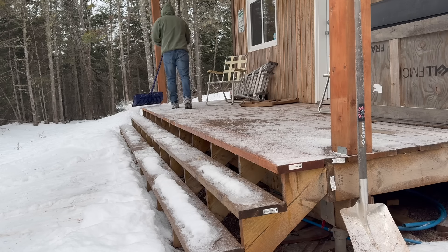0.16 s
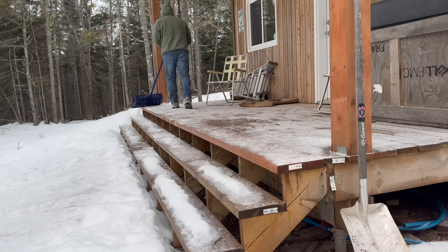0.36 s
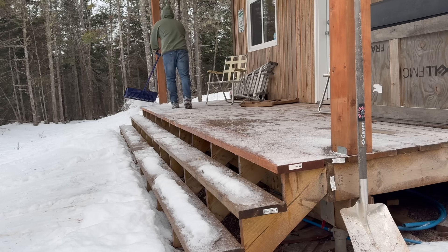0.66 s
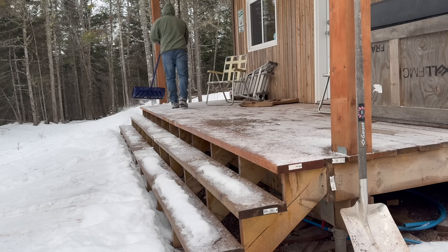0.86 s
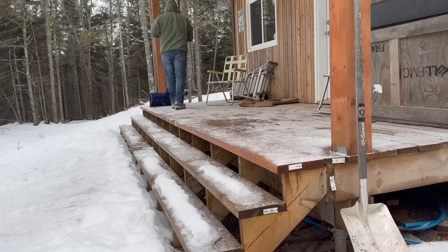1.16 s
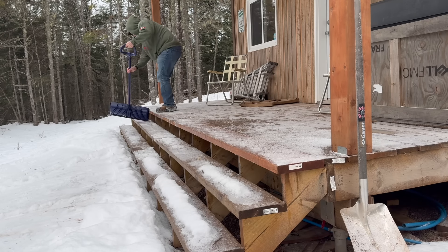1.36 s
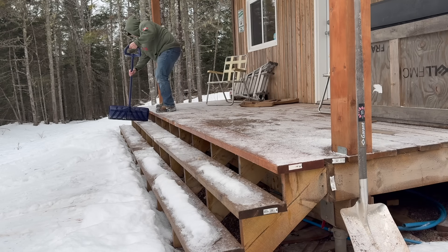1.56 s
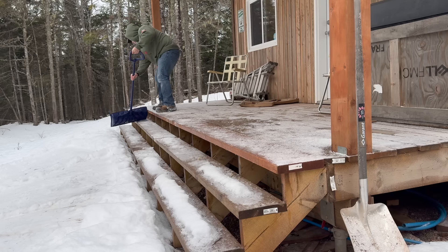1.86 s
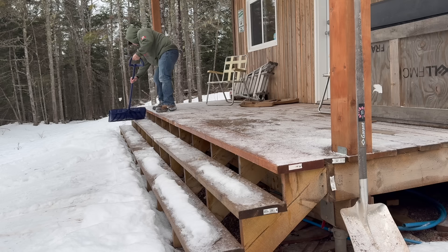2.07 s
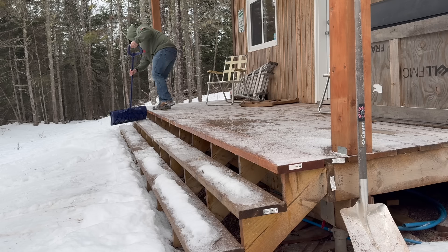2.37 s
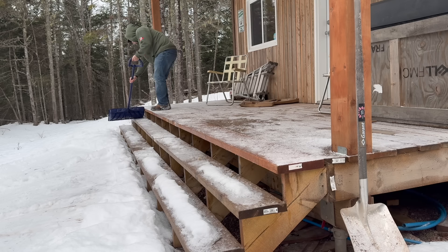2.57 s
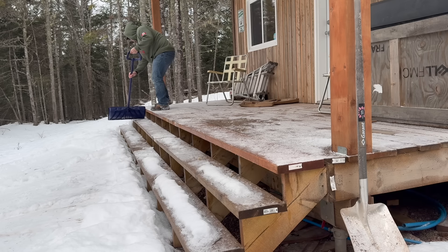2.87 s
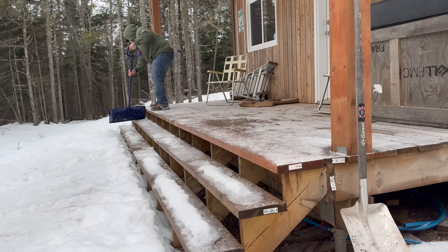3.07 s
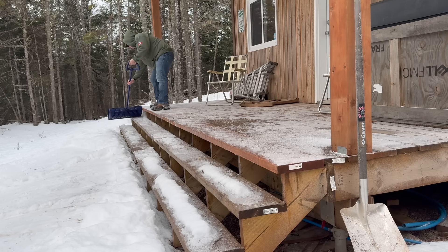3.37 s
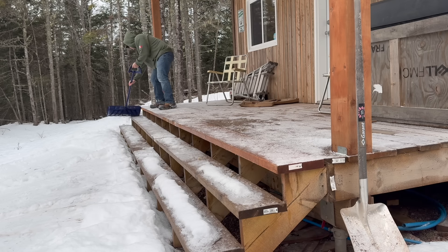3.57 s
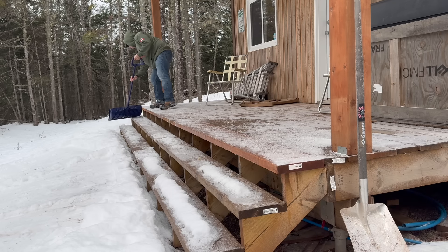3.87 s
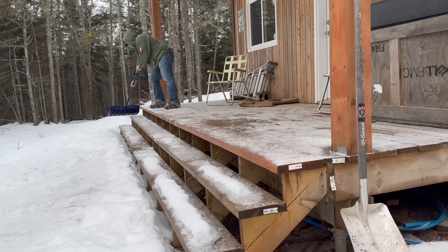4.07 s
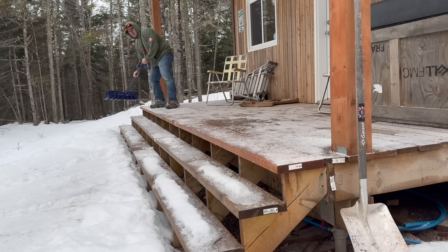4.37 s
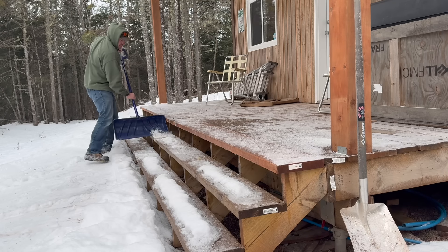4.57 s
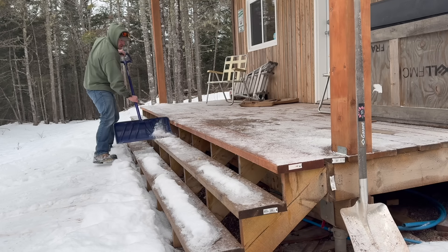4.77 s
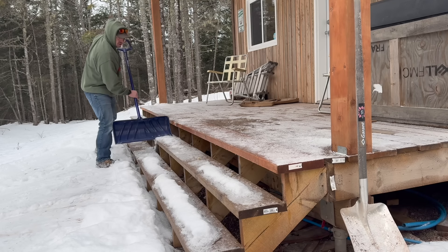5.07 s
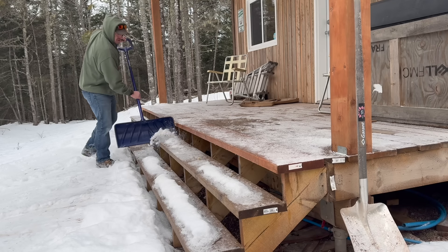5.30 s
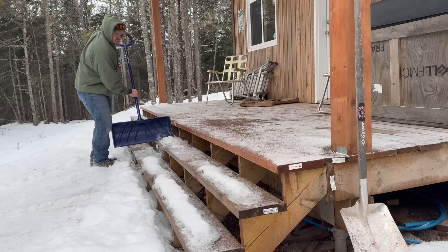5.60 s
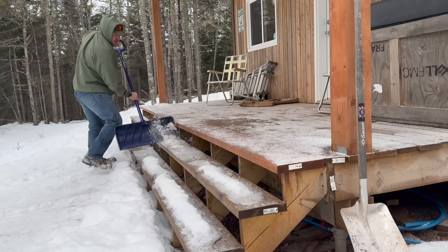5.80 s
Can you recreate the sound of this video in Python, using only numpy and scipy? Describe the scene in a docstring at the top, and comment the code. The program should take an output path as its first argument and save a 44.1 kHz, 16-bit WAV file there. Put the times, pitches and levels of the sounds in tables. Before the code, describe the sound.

A plastic snow shovel scrapes wooden deck boards in short gritty strokes, with sharp catches, hollow knocks and hissing icy snow, outdoors in quiet air.

```python
"""Snow shovel on a wooden deck

A plastic snow shovel scrapes deck boards and steps in short strokes, some metres from a phone with two ports.
Its edge judders over ice grains: shaped noise drives resonances of blade and boards and a hiss of snow.
Sudden decaying bursts mark catches of the edge; damped modes sound taps on the blade and knocks on the deck.
Low noise is the shaking of the hollow deck, decaying noise the short tail from cabin wall and trees.
"""
import sys
import numpy as np
from scipy import signal
from scipy.fft import rfft, irfft, next_fast_len
from scipy.io import wavfile
from scipy.ndimage import uniform_filter1d

SR = 44100
rng = np.random.default_rng(int(sys.argv[2]) if len(sys.argv) > 2 else 0)


def wav_record(signal):
    """Record a signal, one row per channel, as 16-bit PCM in the file named by sys.argv[1]."""
    frames = np.transpose(np.atleast_2d(signal))
    bounded = np.clip(frames, -1, 1)
    # unit amplitude maps onto the largest positive 16-bit level
    quanta = np.round(bounded * 32767).astype(np.int16)
    wavfile.write(sys.argv[1], SR, quanta)


N = 261954
TIME = np.arange(N) / SR  # s
SIZE = next_fast_len(N + SR)  # padded, so that filter tails do not wrap round
FREQ = np.arange(SIZE // 2 + 1) * SR / SIZE  # Hz

# Modes of the blade: f/Hz, bandwidth/Hz, peak gain/dB
BLADE_MODES = [(553.6, 76.5, 2), (660.3, 28, 2), (731, 92, -4.5), (937.5, 49, 4.5), (1043, 63, -3),
               (1222, 87, 4), (1376.5, 35, 0), (1521, 38, 4), (1833, 18.6, -13), (2180, 134, 2.5),
               (2783, 110, -12)]
# Modes of the deck boards over their joists: f/Hz, bandwidth/Hz, peak gain/dB
BOARD_MODES = [(62, 48, -3.5), (88, 47, -3), (124, 34, -3.5), (183.4, 36.4, 0), (252.5, 31, -2),
               (329.4, 44.5, -1.5), (436.3, 34.3, -2), (545, 33, 1)]
CREST_DB = 14.5  # peak of a burst over its rms


def undb(db):
    """Decibel law: the amplitude gain of a level in dB."""
    return 10 ** (np.asarray(db) / 20)


def unit(x):
    """Normalisation of power: scale a signal to rms 1."""
    return x / np.sqrt(np.mean(x ** 2))


def unit_gain(gain):
    """Noise bandwidth: scale a response so that white noise keeps its rms."""
    return gain / np.sqrt(np.mean(np.abs(gain) ** 2))


def curve(points):
    """Linear interpolation over time of (t/s, level/dB) points."""
    return np.interp(TIME, *np.transpose(points))


def shape(points):
    """Spectral envelope: gain interpolated over log frequency from (f/Hz, gain/dB) points."""
    hz, db = np.transpose(points)
    return undb(np.interp(np.log(FREQ + 1), np.log(hz), db))


def rings(modes):
    """Modal superposition: sum of second-order resonators with alternating signs."""
    total = 0
    for k, (hz, width, db) in enumerate(modes):
        resonator = 1j * width * FREQ / (hz ** 2 - FREQ ** 2 + 1j * width * FREQ)
        total = total + (-1) ** k * undb(db) * resonator
    return total


def colour(x, gain):
    """Convolution theorem: filter a signal by multiplying its spectrum by a response."""
    return irfft(rfft(x, SIZE) * gain, SIZE)[..., :N]


def wander(rate):
    """Slow random modulation: new normal values at rate/Hz, joined by straight ramps."""
    hold = max(int(SR / rate), 1)
    steps = np.repeat(rng.standard_normal(N // hold + 1), hold)
    return 0.82 * uniform_filter1d(steps, hold)[:N]


def struck(blows, modes, focus_db):
    """Modal excitation: a blow rings most the modes near its spot, losing focus_db per octave away."""
    out, t = np.zeros(N + SR), np.arange(SR // 4) / SR
    hz, width, mode_db = np.transpose(modes)[:, :, None]
    for s, db, spot_hz, damping in blows:
        share = undb(mode_db - focus_db * np.abs(np.log2(hz / spot_hz)))
        decay = np.exp(-np.pi * width * damping * t)
        ring = np.sum(share * decay * np.sin(2 * np.pi * hz * t), axis=0)
        ring = ring * (1 - np.exp(-t * spot_hz / 1.05))  # soft contact takes about one cycle
        out[int(s * SR):][:len(t)] += undb(db) * ring / np.max(np.abs(ring))
    return out[:N]


def winter_air():
    """Partly coherent ambient noise: faint air, some of it common to both ports."""
    # Spectrum of the air: f/Hz, gain/dB
    air_spectrum = [(25, -9.5), (60, -3.5), (200, -27.5), (1000, -30), (5000, -52), (8500, -44.5),
                    (16000, -47)]
    noise = rng.standard_normal((2, N)) + 0.4 * rng.standard_normal(N)
    return undb(-49 + 1.5 * wander(6)) * unit(colour(noise, shape(air_spectrum)))


def yard(x, t60):
    """Diffuse reverberation: exponentially decaying echoes of wall, roof and trunks, unlike at each port."""
    t = np.arange(SR // 2) / SR
    tail = rng.standard_normal((2, len(t))) * undb(-60 * t / t60) * (t > .003)
    tail = tail / np.sqrt(np.sum(tail ** 2, axis=1, keepdims=True))
    return colour(x, rfft(tail, SIZE))


def deck():
    """Forced and free vibration: the hollow deck shakes under shifting weight and rings when knocked."""
    # Spectrum of the shaking: f/Hz, gain/dB
    shake_spectrum = [(20, -57), (35, -6), (60, 14), (110, 17), (170, -21)]
    # Shaking as weight shifts on the deck: t/s, level/dB
    shake_level = [(0, -34.5), (0.15, -54), (0.29, -37), (0.42, -55), (0.56, -34), (0.61, -49), (0.7, -52),
                   (0.8, -57), (0.98, -43), (1.3, -59), (1.6, -53), (1.8, -38), (2.1, -49), (2.4, -41.5),
                   (2.75, -49), (3.05, -53), (3.27, -39.5), (3.6, -56.5), (3.93, -42), (4.2, -63),
                   (4.4, -46), (4.47, -30), (4.67, -32.5), (4.8, -46.5), (4.86, -39), (5.15, -36.5),
                   (5.32, -46.5), (5.45, -36.5), (5.7, -48.5), (5.8, -41), (5.94, -40)]
    # Boots and blade knock the deck: t/s, peak level/dB, f/Hz favoured at the spot, damping (1 = free)
    knocks = [(0.008, -28, 250, 1.5), (0.067, -18, 58, 1.9), (0.098, -21, 79, 0.57),
              (0.536, -27.5, 71.6, 0.31), (0.619, -28, 340, 2.52), (0.625, -22, 100, 1.6),
              (0.649, -28, 326, 2.3), (0.642, -26, 51.1, 0.55), (0.665, -20, 67.3, 0.61),
              (0.927, -30, 250, 0.76), (0.973, -29, 258, 1.2), (0.999, -27, 293, 1),
              (1.139, -12, 270, 0.71), (1.158, -33, 265, 1.5), (1.185, -32, 300, 1), (1.225, -34, 250, 1),
              (1.763, -13.5, 336, 0.34), (3.098, -21, 180, 0.63), (3.335, -12.5, 328, 0.88),
              (4.499, -18, 100, 1.1), (4.63, -20, 132, 1.1), (4.647, -19, 117, 0.8),
              (4.685, -18, 109.4, 0.98), (4.934, -26.5, 136, 1.05), (5.108, -14.5, 322, 0.6),
              (5.812, -25, 350, 1.5)]
    shaking = unit(colour(rng.standard_normal((3, N)), shape(shake_spectrum)))
    out = shaking * undb(curve(shake_level) + 2.2 * wander(20))
    out[0] += struck(knocks, BOARD_MODES, focus_db=17.0)
    return out


def strokes():
    """Addition of powers: strokes swell, hold and fade over a light drag; colours are averaged by power."""
    # Strokes of the shovel: t/s, rise/s, hold/s, fall/s, blade level/dB,
    # then relative to the blade: boards/dB, upper blade modes/dB, snow hiss/dB
    stroke_table = [(0.035, 0.033, .005, 0.063, -43.5, 9.5, -1, -21),
                    (0.177, 0.01, 0.021, .05, -31.5, 3.5, 1, -3),
                    (0.264, 0.011, 0.027, .06, -33.5, -1.5, -7, -2.5),
                    (0.289, .11, .02, 0.12, -23.5, 2.5, -5, -8),
                    (0.937, 0.083, 0.074, 0.059, -44.5, -1, -1.5, -5),
                    (1.048, .06, 0.025, 0.045, -34, 0, -2.5, -7),
                    (1.269, .1, .01, .08, -34, -0.5, -4.5, -6.5),
                    (1.523, 0.012, 0.074, 0.069, -34, -3, -3.5, -11),
                    (1.624, 0.022, 0.063, .03, -39.5, 1.5, -3, -10.5),
                    (1.704, 0.049, .13, 0.14, -25, -0.5, -1, -1.5),
                    (2.028, 0.12, .08, .1, -28.5, -1.5, -3, -3),
                    (2.29, 0.097, 0.065, 0.19, -23.5, -2, -1.5, -3),
                    (2.673, .03, 0.033, 0.033, -35.5, -0.5, -7, -9.5),
                    (2.746, 0.029, 0.057, 0.25, -29, -1, -5, -6.5),
                    (3.007, 0.21, .15, .17, -22.5, -3, -6, -5),
                    (3.583, 0.063, 0.07, 0.12, -30.5, -0.5, -7.5, -7.5),
                    (3.805, .11, .05, .06, -28.5, 3, -7.5, -5.5),
                    (4.253, 0.064, 0.011, 0.056, -50.5, 5, -4.5, -9),
                    (4.429, 0.016, .03, 0.091, -23.5, -11, -5, -3.5),
                    (4.466, 0.095, 0.041, 0.19, -21, -5.5, -1.5, 0.5),
                    (4.824, .018, 0.0062, 0.073, -39.5, -2.5, -7, -8),
                    (4.985, 0.016, 0.055, .03, -36, -2.5, -3, 0),
                    (5.028, 0.043, .14, 0.055, -20, -8, 1.5, -0.5),
                    (5.328, 0.049, 0.011, 0.023, -31.5, 1.5, 0.5, -3.5),
                    (5.381, 0.012, 0.011, 0.046, -21.5, -9, -9, -8.5),
                    (5.415, .02, .03, 0.068, -37.5, 2, -5, -5),
                    (5.505, 0.03, 0.1, 0.074, -18, -7, -1.5, -1),
                    (5.757, 0.059, .02, 0.043, -27, 1.5, -5.5, -9),
                    (5.814, 0.055, .01, 0.076, -24.5, -2, -5.5, -13)]
    # Light drag of the edge and sliding loose snow between strokes: t/s, level/dB
    drag_level = [(0, -55.5), (0.52, -53), (0.62, -54), (0.72, -69), (0.89, -74), (0.95, -56),
                  (1.25, -51.5), (1.5, -52.5), (1.6, -44), (2.04, -42), (2.28, -50), (2.62, -44),
                  (2.96, -44), (3.02, -52.5), (3.57, -44.5), (3.8, -45.5), (4.0, -45), (4.14, -61),
                  (4.4, -57.5), (4.45, -47), (4.81, -43.5), (4.96, -59), (5.0, -40), (5.3, -46.5),
                  (5.5, -40), (5.94, -41.5)]
    drag_colours_db = (4, -1.5, -4.5)  # boards, upper blade modes, hiss against the drag level
    slide_db, slide_t60 = -16.5, .3  # snow slides on after each stroke; t60 in s

    s, rise, hold, fall, db, *colours = np.transpose(stroke_table)[:, :, None]
    up = np.clip((TIME - s) / rise, 0, 1)
    down = np.clip((s + rise + hold + fall - TIME) / fall, 0, 1)
    power = (undb(db) * up ** 1.32 * down ** 1.76) ** 2
    keep = undb(-120 / (slide_t60 * SR))  # doubled dB, as this decays a power
    power = power + undb(2 * slide_db) * signal.lfilter([1 - keep], [1, -keep], power)
    drag = undb(curve(drag_level)) ** 2
    total = power.sum(axis=0) + drag
    mix = [(c[:, 0] @ power + d * drag) / total for c, d in zip(colours, drag_colours_db)]
    return 10 * np.log10(total), *mix


def grains(spread_db):
    """Granular excitation: dense noise of uneven grain size; rows are shared, left only, right only."""
    size = np.repeat(undb(spread_db * rng.exponential(size=N // 8 + 1)), 8)[:N]
    return unit(size * rng.standard_normal((3, N)))


def slips(rate, spread_db, t60):
    """Stick-slip as a Poisson-like train: random sudden slips of the edge, each decaying quickly."""
    starts = (rng.random(N) < rate / SR) * undb(spread_db * rng.exponential(size=N))
    return signal.lfilter([1], [1, -undb(-60 / (t60 * SR))], starts)


def bursts(times, db):
    """Impulsive release: envelopes that start suddenly and decay exponentially."""
    t60 = 0.058  # s
    starts = np.zeros(N)
    starts[(times * SR).astype(int)] = undb(db)
    return uniform_filter1d(signal.lfilter([1], [1, -undb(-60 / (t60 * SR))], starts), size=16)


def blade_ring(drive, upper_db):
    """Plate resonance: a broad body plus modes that wax and wane as the blade flexes."""
    # Broad body of the scraping edge: f/Hz, gain/dB
    edge_body = [(250, -43), (450, -12), (1000, -6), (1600, -2.5), (2600, -6.5), (4000, -20.5)]
    bend_hz = 1450  # a steep blade angle favours what lies above
    body = shape(edge_body)
    high = 1 / (1 + (bend_hz / (FREQ + 1)) ** 4)
    low_response = (body + rings(BLADE_MODES)) * (1 - high)
    scale = 1 / np.sqrt(np.mean(np.abs(low_response) ** 2))
    out = colour(drive, body * (1 - high)) + undb(upper_db) * colour(drive, body * high)
    out[1:] += colour(drive[1:], rings(BLADE_MODES))
    for k, mode in enumerate(BLADE_MODES):
        lift_db = 3.25 * wander(12) + upper_db * (mode[0] > bend_hz)
        out[0] += (-1) ** k * undb(lift_db) * colour(drive[0], rings([mode]))
    return scale * out


def blade_taps():
    """Free vibration: taps on the blade set its modes ringing."""
    # Taps on the blade: t/s, peak level/dB, f/Hz favoured at the spot, damping (1 = free)
    taps = [(0.923, -37, 530, 0.55), (1.097, -19.5, 550, 0.98), (1.361, -28, 549, 1),
            (1.595, -36, 590, 0.59), (1.757, -9, 1340, 0.63), (1.823, -11.5, 1340, 0.9),
            (2.634, -22, 1391, 0.97), (3.336, -8, 1181, 0.42), (3.938, -13, 1100, 1),
            (4.843, -31, 553.4, 1), (5.397, -12.5, 740, 0.27), (5.449, -18, 570, 0.56),
            (5.597, -14, 1320, 1)]
    return struck(taps, BLADE_MODES, focus_db=34.0)


def board_ring(drive):
    """Structure-borne sound: the edge's force rings the boards, each stretch with more or less bass."""
    # Lift of the lowest board mode from stretch to stretch: t/s, gain/dB
    low_board = [(0, -8), (0.9, -8), (1.5, -3), (2.3, 2), (3.6, 1), (4.0, -3), (4.6, 1), (5.2, -3),
                 (5.94, -2)]
    bass_loss = FREQ ** 2 / (FREQ ** 2 + 150 ** 2)
    boards = colour(drive, unit_gain(rings(BOARD_MODES[3:7]) * bass_loss))
    lowest = colour(boards, 1 / (1 + (FREQ / 220) ** 6))
    return boards + lowest * (undb(curve(low_board)) - 1)


def snow_hiss(envelope):
    """Broadband granular noise: snow sprays off the edge, whose wear strip adds a thin ring."""
    # Spectrum of the snow: f/Hz, gain/dB
    snow_spectrum = [(1800, -13.5), (3000, 0.5), (4200, -3.5), (5200, 0), (6200, -8.5), (8300, -0.5),
                     (10000, -7.5), (13000, -12.5), (15500, -15), (17000, -15)]
    # Modes of the wear strip: f/Hz, bandwidth/Hz, peak gain/dB relative to the snow
    strip_modes = [(3385, 530, -5.5), (5253, 140, 8.5), (6410, 410, -0.5), (8050, 250, -9), (8600, 94, 2)]
    # Nearer the phone less of the top treble is lost: t/s, gain above about 10 kHz/dB
    nearness = [(0, 11), (1.5, 4.5), (1.53, 4.5), (4.4, 2.5), (4.43, 7), (5.94, 9)]
    spray = grains(2.05) * undb(1.92 * wander(300)) * envelope
    snow = colour(spray, unit_gain(shape(snow_spectrum) * (1 + rings(strip_modes))))
    top = colour(snow, 1 / (1 + (10000 / (FREQ + 1)) ** 6))
    return snow + top * (undb(curve(nearness)) - 1)


def shovel(blade_db, boards_db, upper_db, hiss_db):
    """Common excitation: one juddering edge drives blade, boards and snow; catches burst in blade and snow."""
    # Catches of the edge on ice or a board gap: t/s, peak level/dB, treble relative to peak/dB
    catches = [(0.056, -30, -19), (0.182, -20.5, -5), (0.271, -30, -8), (0.419, -13, -5), (0.97, -36, -14),
               (1.096, -25, -13), (1.361, -31, -10), (1.542, -15.5, 1), (1.572, -17, 0), (1.595, -13, -1),
               (1.718, -9, -5), (1.759, -1, 0), (1.778, -9, -3), (1.815, -7, 1), (1.833, -13, -1),
               (1.882, -2, -18), (1.899, -13, -12), (1.931, -14, -12), (2.067, -14, -2), (2.128, -13, -9),
               (2.198, -13.5, -10), (2.297, -22, 7.5), (2.399, -12, -6), (2.408, -5, 6.5), (2.45, -5.5, -3),
               (2.473, -15, -6), (2.633, -25, -15), (2.677, -26, 6), (2.952, -18.5, 2), (3.035, -27, -18),
               (3.088, -22, -9), (3.211, -13, 2), (3.296, -12, -12), (3.333, -3, -14), (3.359, -20, -15),
               (3.61, -15, -4.5), (3.654, -23, 3), (3.938, -23, -16), (4.074, -40, 0), (4.435, -11, 0),
               (4.445, -10, -4), (4.529, -2.5, -5), (4.55, -4.5, -4), (4.562, -8, -4), (4.585, -8, -8),
               (4.652, -8, -22), (4.842, -25.5, -5), (4.986, -22, -14), (5.061, -4, -8), (5.079, 0, -8),
               (5.105, -3, -14), (5.119, -10, -10), (5.149, -19, -12), (5.174, -14, -1), (5.218, -32, -1),
               (5.396, -9, 2.5), (5.521, -14, 4), (5.543, -9, -8), (5.571, -11, 9), (5.597, -3, 0),
               (5.615, -10, -8), (5.639, -14, -8), (5.862, -8, 1)]
    s, peak_db, treble_db = np.transpose(catches)
    judder = undb(0.91 * wander(45) + 1.23 * wander(130)) * (1 + 0.3 * slips(70, 2.9, 0.038))
    push = unit(judder) * undb(blade_db)
    grit = grains(1.44)
    blade = blade_ring(grit * (push + bursts(s, peak_db - CREST_DB)), upper_db)
    blade[0] += blade_taps()
    boards = board_ring(grit * push * undb(boards_db))
    snow = snow_hiss(push * undb(hiss_db) + bursts(s, peak_db + treble_db - CREST_DB))
    return blade + boards + snow


def scene():
    """Superposition: shovel and deck reach both ports directly and by echo, over faint winter air."""
    # Phase by which the right port leads: f/Hz, phase/rad
    right_lead = [(0, 0), (1700, -.1), (3200, -1.6), (4900, -.2), (5700, -.1), (6900, 1.7), (7700, .1),
                  (8300, .4), (9500, 3.1), (15600, 15.7), (22050, 29)]
    # Wide blade and long boards sound from many spots, unlike at the two ports:
    # f/Hz, gain of the unshared part/dB
    spread = [(30, 10), (120, -11), (300, -14), (1000, -7), (2500, -9), (4500, 3), (7200, -8), (8000, -6),
              (9500, -24), (16000, -12)]
    # The phone's case shades the right port: f/Hz, right relative to left/dB
    shade = [(300, 1), (1000, -2.5), (2800, -1.5), (3800, -4.5), (5000, -8), (6300, -3.5), (8000, -0.5),
             (16000, 0.5)]
    sound = shovel(*strokes()) + deck()
    lead = np.exp(1j * np.interp(FREQ, *np.transpose(right_lead)))
    ports = np.array([sound[0], colour(sound[0], lead)])
    ports = ports + colour(sound[1:], shape(spread))
    ports = ports + undb(-20) * yard(sound[0], t60=0.64)
    return colour(ports + winter_air(), np.array([np.ones(len(FREQ)), shape(shade)]))


def record(dry):
    """Soft saturation and band limiting: peaks are rounded, high treble dips, deep bass and top are cut."""
    notch_hz, notch_width_hz, notch_db = 12100, 810, -13.5
    bass_cut_hz, top_hz = 46.5, 15900
    dip = undb(notch_db / (1 + ((FREQ - notch_hz) / notch_width_hz) ** 2))
    rounded = colour(np.tanh(dry) / 1.2, dip)
    bass_cut = signal.butter(2, bass_cut_hz, "high", fs=SR, output="sos")
    top_cut = signal.ellip(10, .2, 80, top_hz, fs=SR, output="sos")
    return signal.sosfilt(top_cut, signal.sosfilt(bass_cut, rounded))


dry = scene()
out = record(dry)
wav_record(out)
```